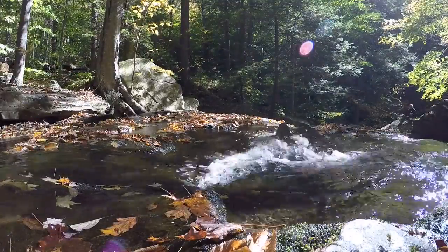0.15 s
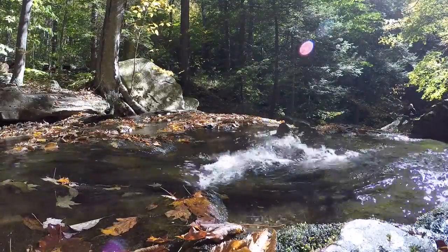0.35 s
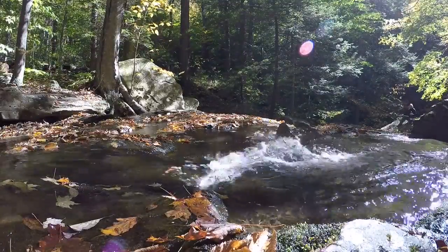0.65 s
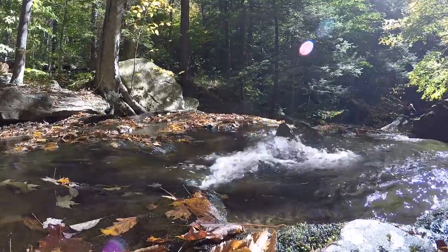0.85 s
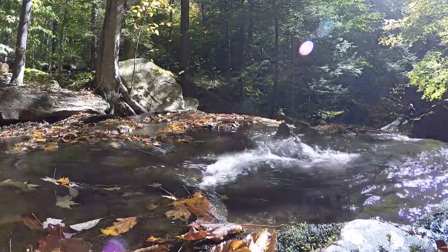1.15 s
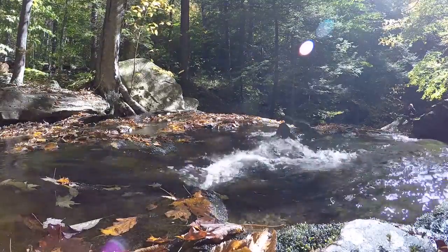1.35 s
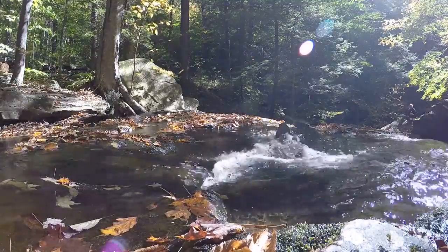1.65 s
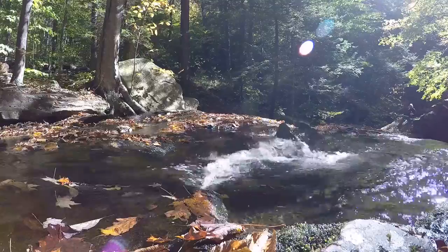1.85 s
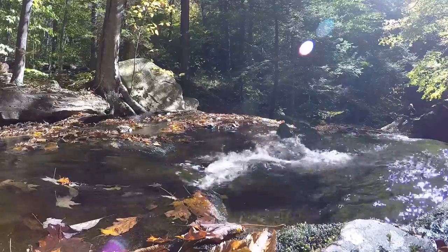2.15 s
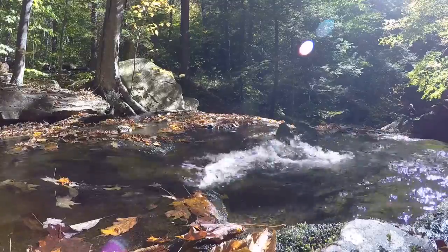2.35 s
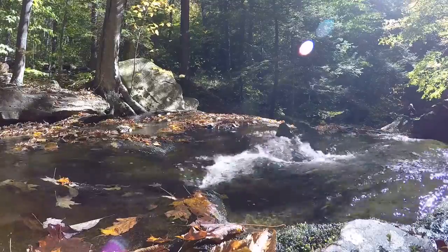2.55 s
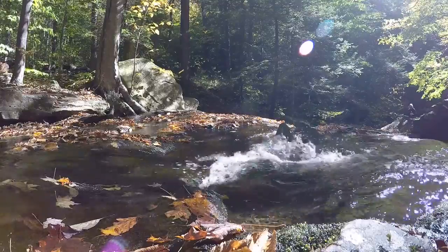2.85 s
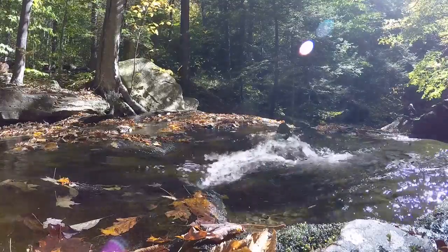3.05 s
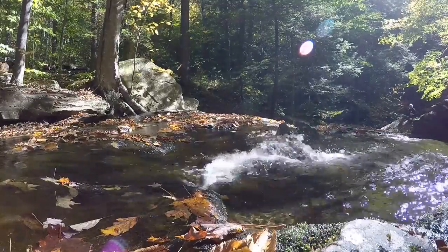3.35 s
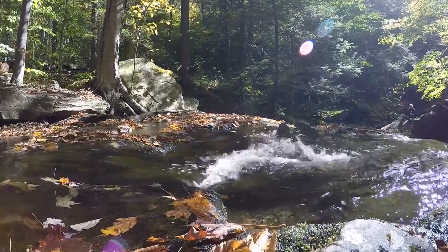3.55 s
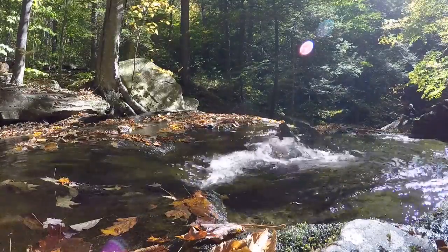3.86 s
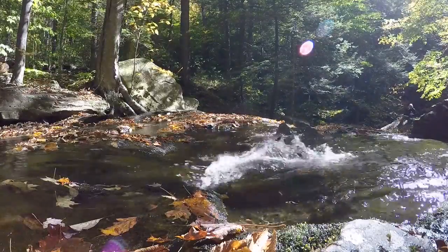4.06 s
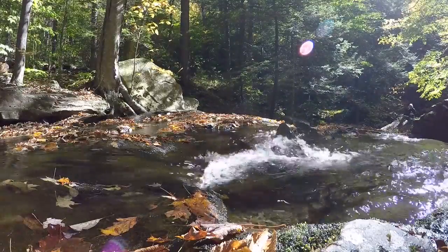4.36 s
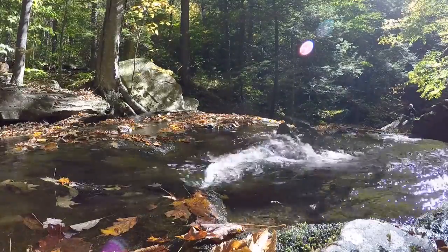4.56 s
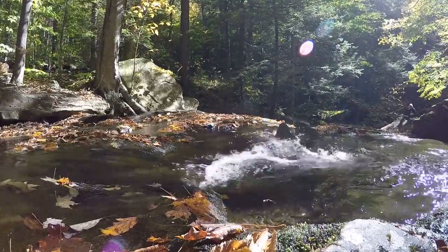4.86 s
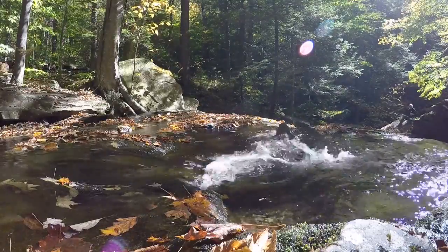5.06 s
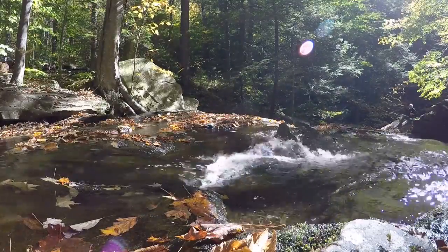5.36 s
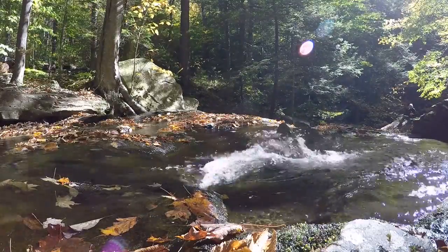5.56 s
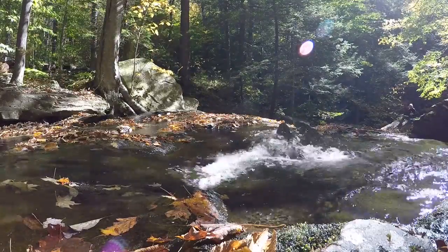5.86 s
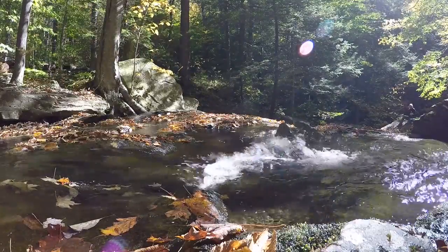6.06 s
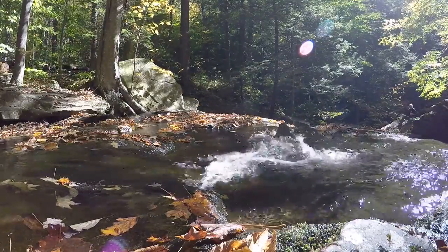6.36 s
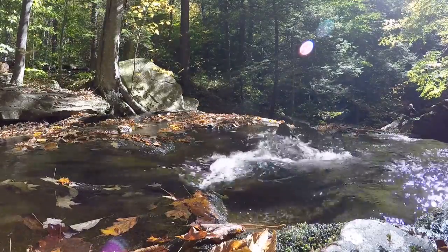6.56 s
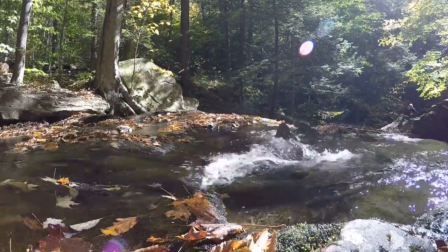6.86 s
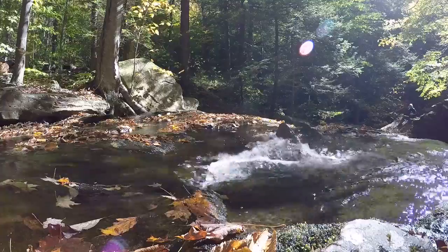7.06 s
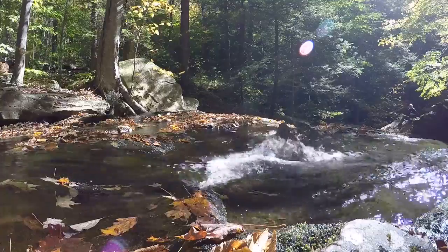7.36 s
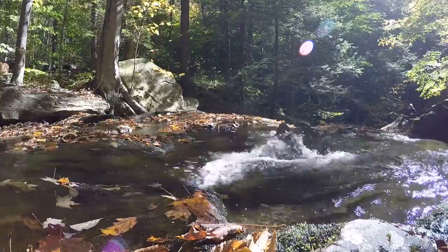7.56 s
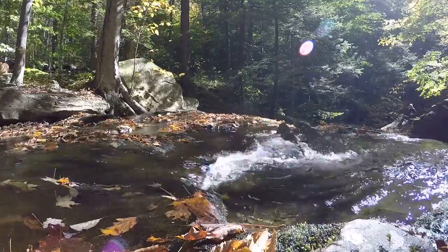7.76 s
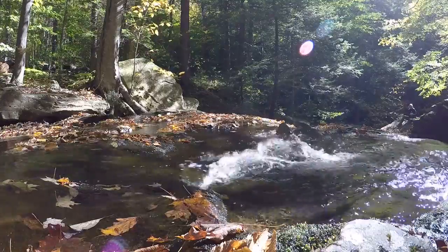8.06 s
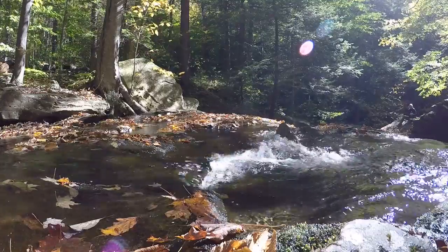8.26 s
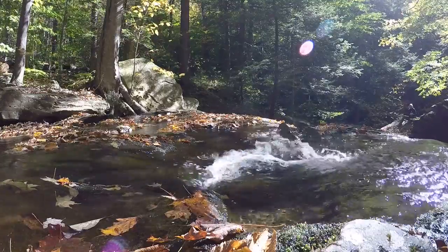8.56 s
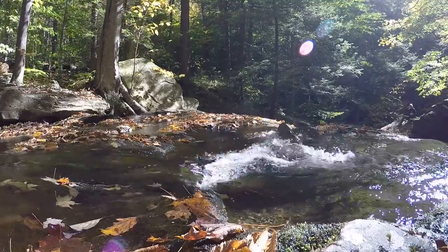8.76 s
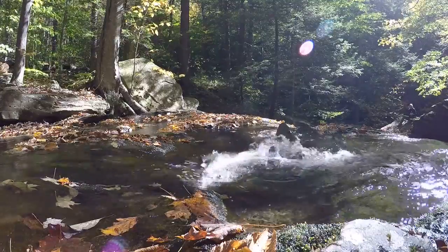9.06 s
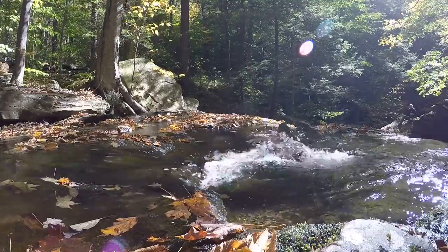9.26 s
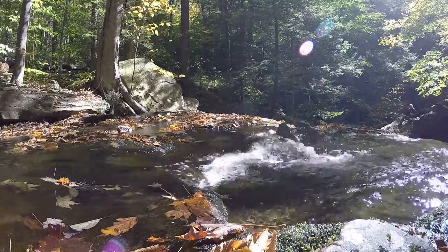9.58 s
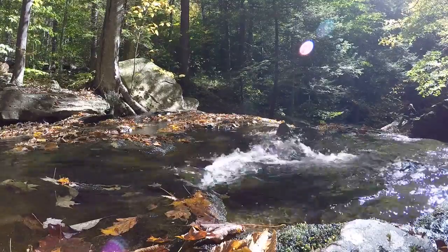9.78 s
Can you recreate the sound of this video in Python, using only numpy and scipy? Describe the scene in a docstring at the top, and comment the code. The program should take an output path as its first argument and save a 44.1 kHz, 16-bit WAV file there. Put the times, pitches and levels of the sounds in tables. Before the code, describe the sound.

Water rushes and splashes over rocks in a shallow woodland cascade from start to finish, sounding slightly thin and boxy. Small bubble pops and droplet ticks are scattered through the wash. Midway, a few slightly heavier sloshes pass, followed by a single quiet glug, and another slosh comes near the end. Underneath, light wind brushes the microphone with a faint, low rumble.

```python
"""A small forest stream

Water pours over a rock ledge a few metres away, heard through a camera housing. Uneven splashes fold
in a cloud of tiny ringing bubbles over a smooth wash. Single bubbles and droplets stand out,
one pocket of air glugs, and faint gusts of wind rumble on the microphone."""
import sys
import numpy as np
from scipy import signal
from scipy.fft import rfft, irfft
from scipy.io import wavfile
from scipy.ndimage import uniform_filter1d

SR = 44100
rng = np.random.default_rng(int(sys.argv[2]) if len(sys.argv) > 2 else 0)


def digitize_waveform(pressure):
    """Quantize a signal to 16-bit integers and store it at the path in sys.argv[1].

    Rows of a 2-D input are taken as channels; values are limited to [-1, 1].
    """
    field = np.atleast_2d(pressure).T
    bounded = np.clip(field, -1, 1)
    quanta = np.round(bounded * 32767).astype(np.int16)
    wavfile.write(sys.argv[1], SR, quanta)


N = 437472
TIME = np.arange(N) / SR
FREQS = np.fft.rfftfreq(N, 1 / SR)

# tone of the rushing water, from low to high: f/Hz, relative level/dB
WATER_TONE = [(100, -15), (180, -17), (320, -14.5), (550, -18), (950, -16), (1300, -8.5), (1600, -9),
              (3000, -10), (4100, -11), (4600, -19), (5500, -17), (8000, -29.5), (11500, -34.0),
              (15100, -40.5)]
# how much of the water's power is bubbles, the rest being wash: f/Hz, share/0-1
BUBBLE_SHARE = [(150, .1), (500, 0.39), (1100, 0.58), (1800, 0.59), (3500, 0.49), (6000, 0.39),
                (12000, 0.28)]
# pitches that the housing boosts or weakens: f/Hz, width/Hz, gain/dB
HOUSING_RESONANCES = [(1108, 71, 2.5), (1259, 163, -8.5), (1771, 455, 8.0), (2166, 140, -2),
                      (2564, 480, 5.5), (3385, 304, 5), (3550, 86, -3), (3776, 220, 5.5), (4520, 100, -6.5),
                      (5170, 500, 3.5), (5940, 300, -3), (6300, 260, 2), (6570, 350, -4.5),
                      (6940, 450, 3.5), (8010, 570, 5.4), (9330, 1560, 4), (13800, 1620, 6.2)]
# heavy sloshes over the ledge: t/s of the crest, boost/dB
HEAVY_SLOSHES = [(4.46, 1.4), (4.79, 2.0), (5.42, 1.5), (5.73, 1.5), (9.27, 2.5)]
# loud bubbles close by: t/s, relative peak level/dB, f/Hz, time to fade by 60 dB/s
NEAR_BUBBLES = [(1.2752, -35, 3270, .012), (1.8677, -38, 5040, .009), (2.2934, -30.5, 3810, .007),
                (2.512, -31.5, 3750, .006), (2.753, -34, 1750, .013), (2.914, -30, 3400, .007),
                (4.0694, -35, 3660, .011), (4.9816, -35, 2500, .015), (5.3197, -39, 4800, .01),
                (5.4617, -32, 1870, .018), (5.7981, -43, 1210, .017), (5.8215, -36.5, 2540, .014),
                (6.4877, -28.5, 2550, .015), (7.5775, -28, 2650, .017), (7.6587, -32.5, 3860, .009),
                (7.6799, -34, 3440, .009), (7.696, -35, 2040, .018), (8.4565, -32, 2540, .007),
                (8.6923, -43, 1130, .018), (8.8096, -33, 3470, .007), (8.8252, -37, 4300, .01)]
# one big pocket of air under the ledge: t/s, level/dB, f/Hz, time to fade by 60 dB/s
AIR_POCKET = (6.147, -49.5, 259, .35)
# droplets landing close by: t/s, peak level/dB
NEAR_DROPLETS = [(4.125, -44), (6.92, -47), (7.379, -47), (7.95, -46), (8.809, -46), (9.15, -45)]
# gusts at the microphone: start t/s, length/s, level/dB
WIND_GUSTS = [(0.35, 1.13, -56.5), (1.45, 0.52, -61), (2.2, .95, -58.5), (3.15, .65, -61),
              (4.5, 1.05, -62.5), (6.2, .8, -63), (7.383, .72, -56.5), (9.5, .45, -63)]
# tone of the wind's rumble: f/Hz, relative level/dB
WIND_TONE = [(4, -34), (12, -7), (20, -0.5), (45, -2), (62, -8.5), (82, -13.5), (130, -24.5), (250, -57)]
# low pitches that the wind shakes, probably in the camera mount: f/Hz, width/Hz, gain/dB
MOUNT_RESONANCES = [(31, 5.7, 8), (44.1, 5.6, 11), (59.9, 4.5, 12.5)]


def falling_water(level_db=-44, gurgle_hz=1750, gurgle_width_hz=850, fizz_above_hz=2300):
    """Bubbles, spray and the smooth wash of farther water, all heard through the housing."""
    share = look_up(BUBBLE_SHARE)
    splashes = wander(fastest_hz=30)
    wash = shape_tone(rng.standard_normal(N), np.sqrt(1 - share))
    bubbles = shape_tone(bubble_cloud(splashes), np.sqrt(share))
    tone = from_db(look_up(WATER_TONE) + resonance_db(HOUSING_RESONANCES))
    water = unit_level(shape_tone(bubbles + wash + spray(), tone))
    # the deep body holds steady; mid-sized bubbles gurgle and small ones fizz in their own surges
    gurgle = irfft(rfft(water) / (1 + (2 * (FREQS - gurgle_hz) / gurgle_width_hz) ** 4), N)
    fizz = irfft(rfft(water - gurgle) * (1 - 1 / (1 + (FREQS / fizz_above_hz) ** 8)), N)
    body = water - gurgle - fizz
    gurgle *= surges(depth_db=.65, fastest_hz=3.5, slowest_hz=2.5) * sloshes()
    fizz *= surges(depth_db=.23, fastest_hz=3.5, slowest_hz=1.3)
    return from_db(level_db) * (body + gurgle + fizz)


def bubble_cloud(splashes, spread_db=4, splash_db=1.1, clump_db=1.08, tries=6000):
    """Splashes trap air as bubbles of all sizes; those of like size swell together in clumps."""
    out = np.zeros(N)
    pitches = np.geomspace(200, 15500, 72)
    for clump in np.array_split(pitches, 12):
        surge_db = splash_db * splashes + clump_db * wander(fastest_hz=9.9)
        for hz in clump:
            # smaller bubbles ring higher, die sooner and are born more often
            per_second = 300 * (hz / 2500) ** .4
            ring_cycles = 43 * (hz / 2500) ** .22
            when, chance = rng.random((tries, 2)).T
            born = chance < per_second * TIME[-1] / tries
            db = spread_db * np.minimum(rng.standard_normal(tries), 2.6)
            db += surge_db[(when * len(surge_db)).astype(int)]
            strengths = born * from_db(db) * rng.choice([-1, 1], tries)
            births = np.bincount((when * N).astype(int), strengths, N)
            rings = signal.oaconvolve(births, bubble(hz, ring_cycles / hz))[:N]
            out += np.sqrt(hz) * unit_level(rings)  # equal power per Hz on average
    return unit_level(out)


def bubble(hz, fade_s, rise=.045, onset_cycles=.36):
    """A new bubble rings and dies away; its pitch climbs as it nears the surface."""
    t = np.arange(int(max(fade_s, .001) * SR)) / SR
    cycles = hz * (t + rise * t ** 2 / (2 * fade_s))
    decay = np.exp(-np.log(1000) * t / fade_s)
    onset = 1 - np.exp(-cycles / onset_cycles)
    return np.sin(2 * np.pi * cycles) * decay * onset


def spray(per_second=35, spread_db=5.5, relative_db=-17):
    """Thrown droplets tick as they fall back on the water."""
    lands = rng.random(N) < per_second / SR
    ticks = lands * from_db(spread_db * np.minimum(rng.standard_normal(N), 2))
    return from_db(relative_db) * unit_level(keep_treble(ticks, above_hz=5000))


def surges(depth_db, fastest_hz, slowest_hz):
    """Loudness swells and sinks at random as water spills over the ledge."""
    return from_db(depth_db * signal.resample(wander(fastest_hz, slowest_hz), N))


def sloshes(swell_s=.082):
    """Each heavy slosh folds in more air, lifting the loudness for a moment."""
    return from_db(sum(db * np.exp(-((TIME - t) / swell_s) ** 2) for t, db in HEAVY_SLOSHES))


def near_bubbles(boost_db=.7):
    """A few close bubbles plink above the rush."""
    out = np.zeros(N)
    for start, db, hz, fade_s in NEAR_BUBBLES:
        ring = bubble(hz, fade_s, rise=.03, onset_cycles=.84)
        add(out, start, from_db(db + boost_db) * ring / abs(ring).max())
    return out


def glug():
    """A big pocket of air rings like a bubble, but low and long."""
    out = np.zeros(N)
    start, db, hz, fade_s = AIR_POCKET
    add(out, start, from_db(db) * bubble(hz, fade_s, rise=.072, onset_cycles=.4))
    return out


def near_droplets(decay_s=.0011):
    """A droplet slaps the water with about a millisecond of bright fizz."""
    out = np.zeros(N)
    decay = np.exp(-TIME[:400] / decay_s)
    for start, db in NEAR_DROPLETS:
        tick = keep_treble(rng.standard_normal(len(decay)) * decay, above_hz=7500)
        add(out, start, from_db(db) * tick / abs(tick).max())
    return out


def bank_bubbles(count=24, level_db=-44, spread_db=2, low_hz=4500, high_hz=9000, ring_cycles=45):
    """Tiny bubbles ping at random by the near bank; the smaller, the fainter and shorter."""
    out = np.zeros(N)
    middle_hz = np.sqrt(low_hz * high_hz)
    for when, smallness, luck in rng.random((count, 3)):
        hz = low_hz * (high_hz / low_hz) ** smallness
        db = level_db - 9 * np.log2(hz / middle_hz) + spread_db * (2 * luck - 1)
        add(out, when * TIME[-1], from_db(db) * bubble(hz, ring_cycles / hz))
    return out


def wind(calm_db=-67, rise_s=.25, fall_s=.35):
    """Swirling air presses on the microphone and shakes the mount; gusts swell and die away."""
    tone = from_db(look_up(WIND_TONE) + resonance_db(MOUNT_RESONANCES))
    rumble = shape_tone(rng.standard_normal(N), tone)
    steady = rumble / np.sqrt(uniform_filter1d(rumble ** 2, size=6000))
    power = from_db(calm_db) ** 2
    for start, length, db in WIND_GUSTS:
        swell = np.minimum((TIME - start) / rise_s, (start + length - TIME) / fall_s)
        power += np.clip(swell, 0, 1) * from_db(db) ** 2
    return np.sqrt(power) * steady


def wander(fastest_hz, slowest_hz=7, points=2048):
    """A random curve across the scene that moves mostly between the two rates."""
    hz = np.fft.rfftfreq(points, N / SR / points)
    band = hz / np.hypot(hz, slowest_hz) / np.hypot(hz, fastest_hz)
    return unit_level(irfft(rfft(rng.standard_normal(points)) * band))


def shape_tone(sound, gain):
    """Turns each frequency up or down, so that resonances ring after a hit, never before."""
    mirrored = np.r_[gain, gain[-2:0:-1]]
    phase = -signal.hilbert(np.log(np.maximum(mirrored, 1e-5))).imag[:len(gain)]
    return irfft(rfft(sound) * gain * np.exp(1j * phase), N)


def resonance_db(table):
    """Adds up rounded peaks and dips, in dB at each frequency."""
    return sum(db / (1 + (2 * (FREQS - hz) / width) ** 2) for hz, width, db in table)


def look_up(table):
    """Fills in a value at every frequency between a table's rows."""
    hz, values = np.transpose(table)
    return np.interp(np.log(FREQS + 1), np.log(hz + 1), values)


def keep_treble(sound, above_hz):
    """Filters out the low notes."""
    return signal.sosfilt(signal.butter(2, above_hz, "high", fs=SR, output="sos"), sound)


def from_db(db):
    """Turns decibels into a number to multiply by."""
    return 10 ** (np.asarray(db) / 20)


def unit_level(sound):
    """Scales a sound to an average power of 1."""
    return sound / np.sqrt(np.mean(sound ** 2) + 1e-20)


def add(mix, start_s, sound):
    """Mixes a sound in at the given time."""
    part = mix[max(round(start_s * SR), 0):][:len(sound)]
    part += sound[:len(part)]


def scene():
    """The stream and the wind, in one channel."""
    return (falling_water() + near_bubbles() + glug() + wind() + near_droplets() + bank_bubbles())[None]


def record(dry, top_hz=15300):
    """Cuts off the very highest treble."""
    low_pass = signal.firwin(1023, top_hz, window=("kaiser", 9), fs=SR)
    return signal.oaconvolve(dry, low_pass[None], "same")


dry = scene()
out = record(dry)
digitize_waveform(out)
```